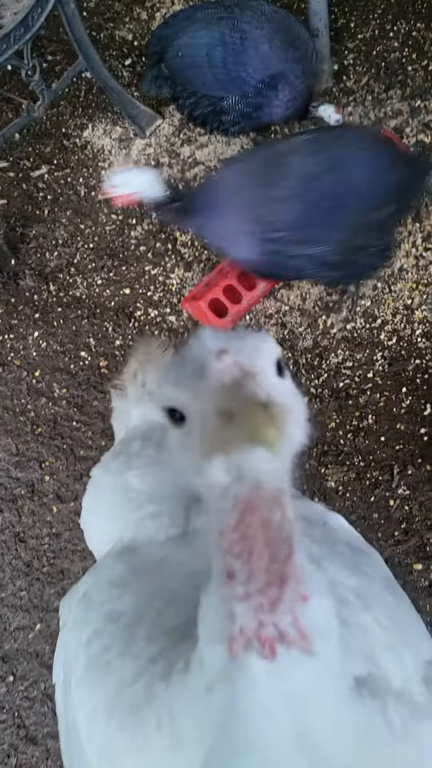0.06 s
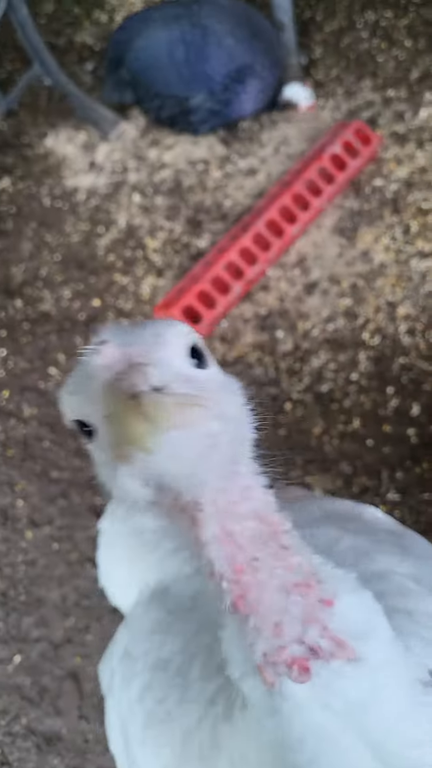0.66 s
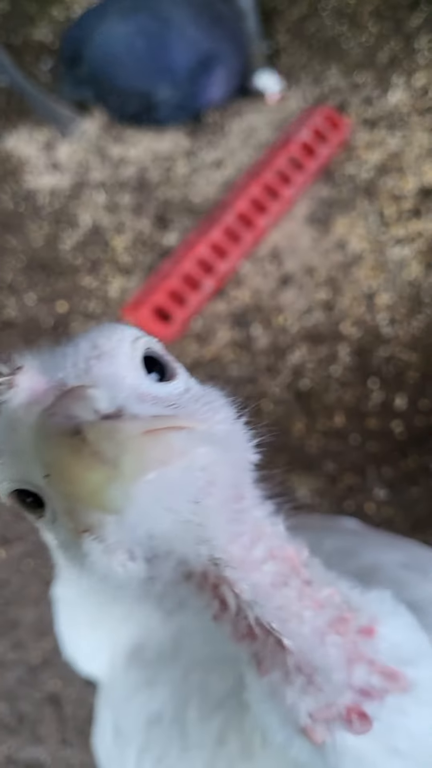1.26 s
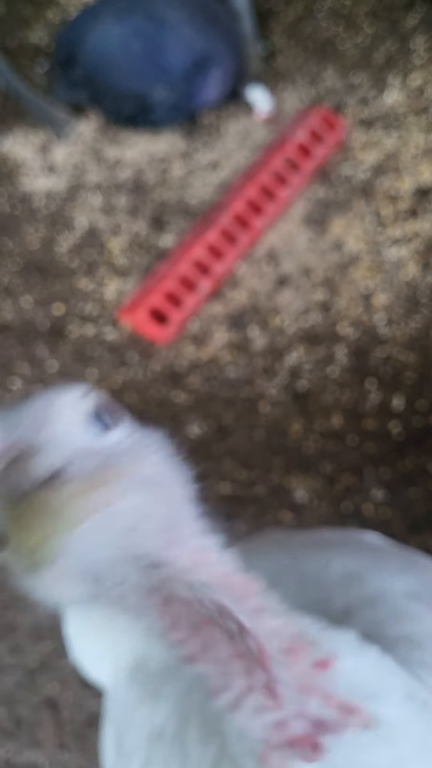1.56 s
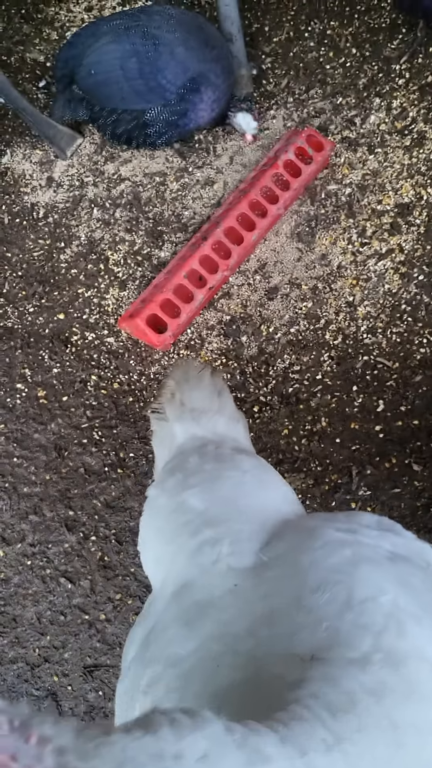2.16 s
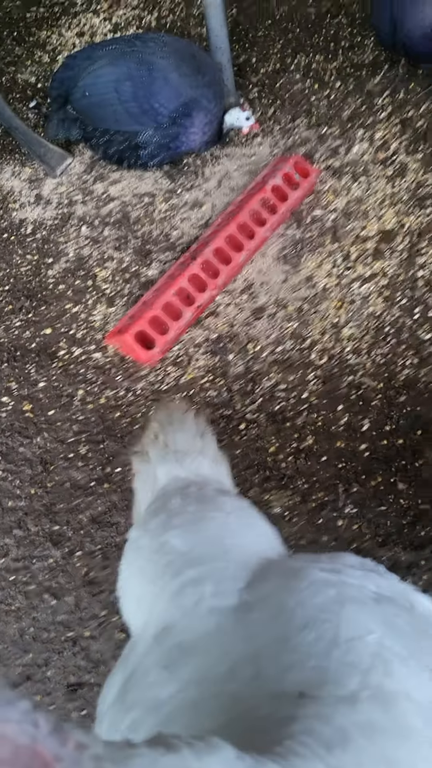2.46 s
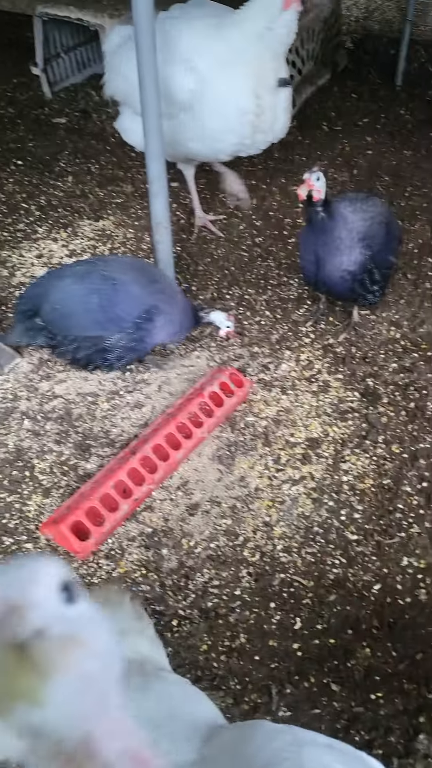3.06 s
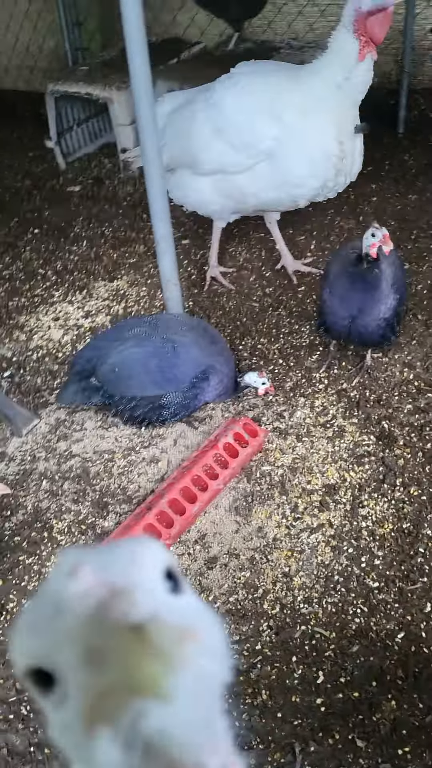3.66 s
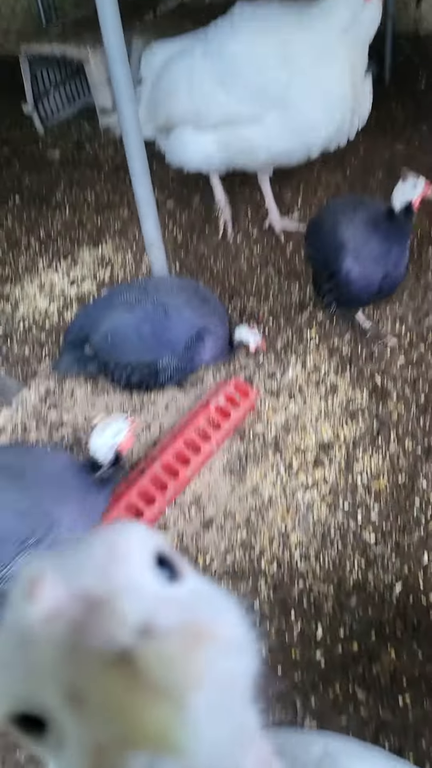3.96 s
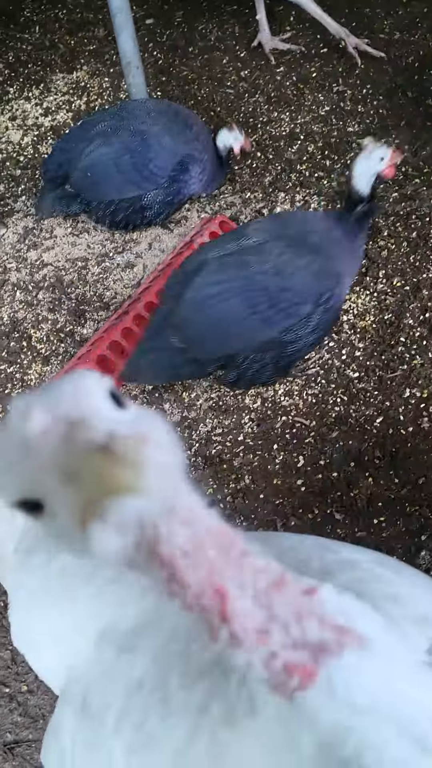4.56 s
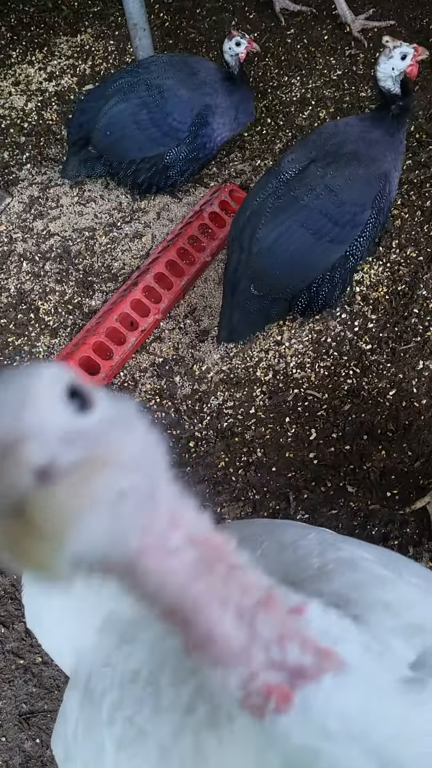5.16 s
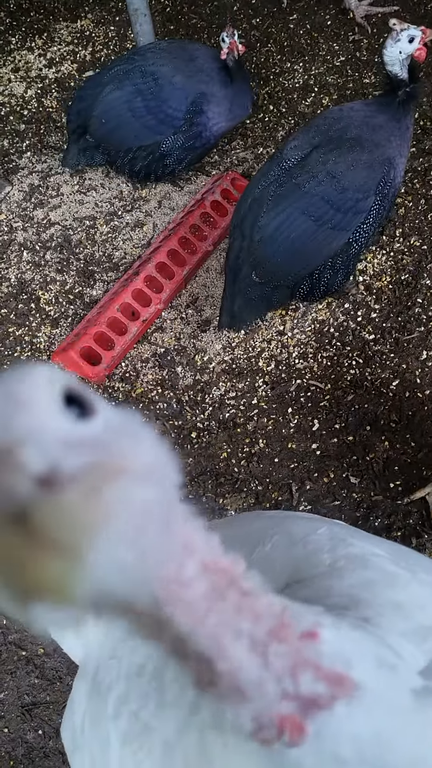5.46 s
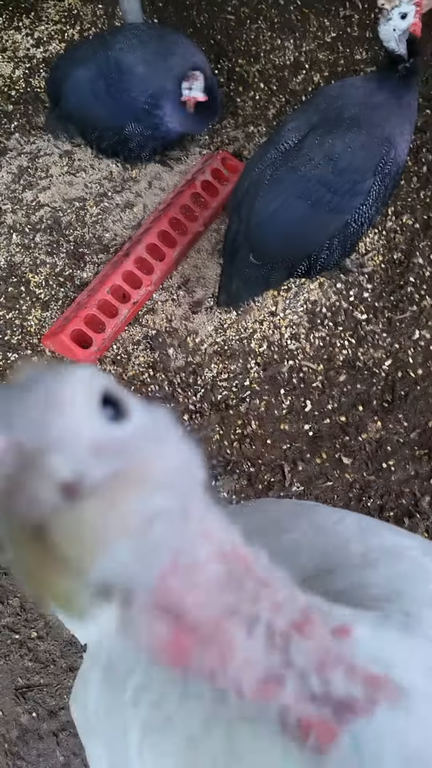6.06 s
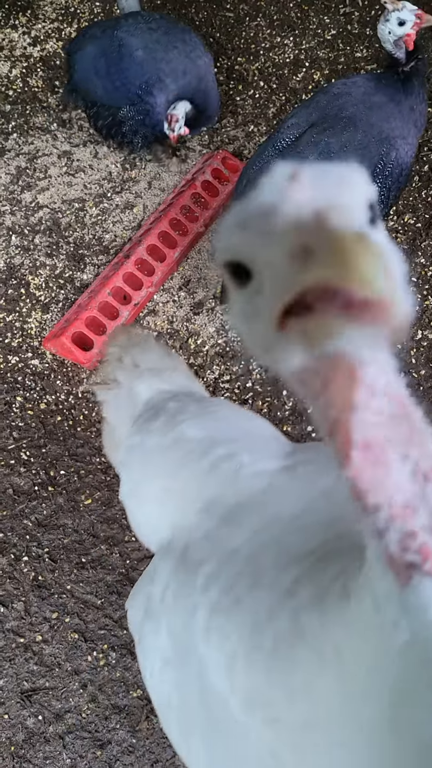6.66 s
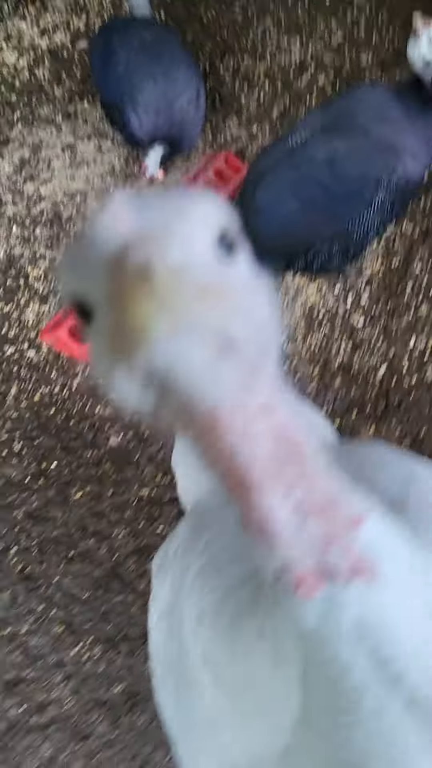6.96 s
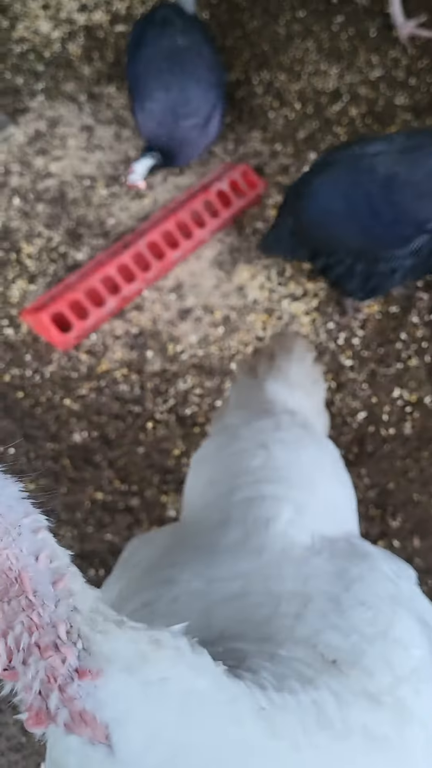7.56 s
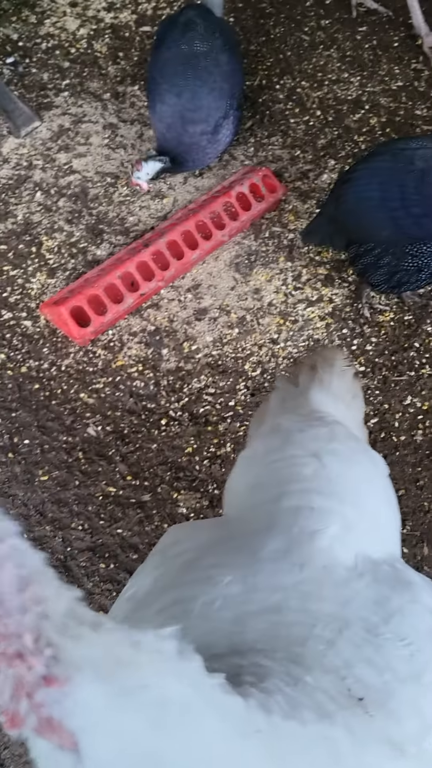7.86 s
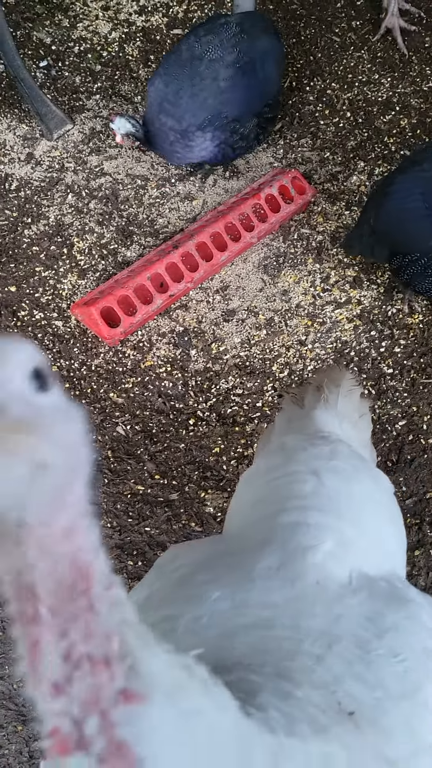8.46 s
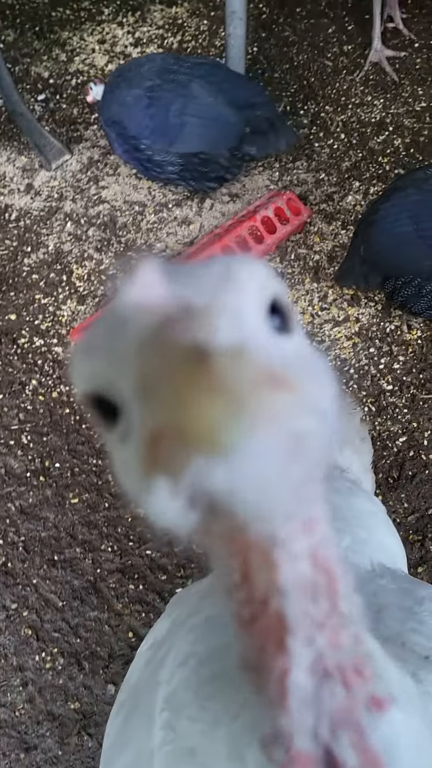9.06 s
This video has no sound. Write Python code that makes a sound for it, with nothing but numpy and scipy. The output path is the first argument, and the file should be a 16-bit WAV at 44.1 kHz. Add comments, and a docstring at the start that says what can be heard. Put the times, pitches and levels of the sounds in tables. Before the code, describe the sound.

Over the low rumble of far traffic, a guineafowl makes scattered brief chips and peeps among light seed clicks and faint rustling. Midway it pecks sharply right by the microphone, honks once through its nose-like call and clucks softly, then pecks harder. Near the end a rooster crows far off and two more taps crack. The covered pen adds a brief reverberation.

```python
"""A short two-voiced chip sounds over a low rumble: a guineafowl feeds on a wooden bench in a roofed pen.
Its syrinx gives chips, thin peeps and one nasal honk, which ends like a knock before a soft low cluck.
Between them come a few hard, very close taps, each a crack and a damped ring; seeds tick and feet scuff.
Far traffic rumbles and hums, something rustles faintly, and near the end a distant rooster crows.
Reflections from the roof and walls add a brief reverberation."""
import sys
import numpy as np
from scipy import signal
from scipy.fft import rfft, irfft, next_fast_len
from scipy.io import wavfile
from scipy.ndimage import map_coordinates

SR = 44100
rng = np.random.default_rng(int(sys.argv[2]) if len(sys.argv) > 2 else 0)


def generate_wav(signal):
    """Clip the signal to [-1, 1] and save it as 16-bit WAV at the path in sys.argv[1]."""
    frames = np.transpose(np.atleast_2d(signal))
    scaled = np.clip(frames, -1, 1) * 32767
    pcm = np.round(scaled).astype(np.int16)
    wavfile.write(sys.argv[1], SR, pcm)


N = 411012
TOP_HZ, BIRD_LAG_MS = 16000, 0.2677  # band limit; delay of chips and honk in the right channel
SIDES = np.array([[.5], [-.5]])  # splits a difference between left and right

# Spectra of the background noises. Each row: frequency in Hz, relative density in dB.
RUMBLE_SPECTRUM = [(15, -48), (30, -19), (46, -2.5), (70, 1.5), (100, -0.5), (135, -4), (190, -9),
                   (260, -15), (350, -16), (450, -32.5), (900, -90)]
DRONE_SPECTRUM = [(150, -24), (300, -5), (500, -2.5), (800, 2.5), (1100, -4.5), (1500, -7.5), (2000, -16.5),
                  (3000, -26.5), (5000, -29.5), (9500, -39.5)]
HISS_SPECTRUM = [(500, -10), (3000, -0.5), (5000, -0.5), (6500, -1), (8000, 4), (9200, -7), (15000, -7.5)]
RUSTLE_SPECTRUM = [(800, -15), (2500, 0.5), (4500, 1), (6000, -1.5), (7900, 2), (9300, -4.5), (13000, -4.5),
                   (16000, -17)]
# Course of the traffic. Each row: time in seconds, relative drone and rumble levels in dB.
TRAFFIC_LEVELS = [(0.0, -50.5, -40), (1.63, -53, -39.5), (4.13, -49.5, -39.5), (4.49, -49.5, -39),
                  (4.7, -52.5, -41.5), (6.85, -54, -43), (7.58, -49.5, -38), (8.98, -47.5, -37.5),
                  (9.32, -47.5, -39.5)]
# Course of the hum. Each row: time in seconds, level in dB.
HUM_LEVELS = [(0, -45.5), (4.8, -45.5), (7, -42), (8.2, -39), (9.32, -40)]
# Swells of the rustle. Each row: middle in seconds, half width in seconds, level in dB.
RUSTLE_SWELLS = [(0.7, 0.38, -67), (2.78, 0.32, -63.5), (3.93, 0.32, -59), (4.45, 0.13, -67),
                 (5.9, 0.25, -67.5), (7.08, 0.13, -60), (7.72, 0.16, -60.5)]
# Likeness of the channels in the background. Each row: frequency in Hz, coherence from 0 to 1.
COHERENCE = [(60, 0.99), (350, 0.95), (700, 0.73), (1000, 0.59), (2000, 0.11), (3000, 0.033)]
# Phase of the background. Each row: frequency in Hz, lead of the left channel in radians.
LEFT_LEAD = [(100, .05), (440, 0.39), (520, 0.75), (750, 1.89), (900, 2.29), (1300, 2.9), (2000, 4.4)]
# Reverberation of the pen. Each row: frequency in Hz, time to fall 60 dB in seconds.
PEN_T60 = [(100, 0.15), (600, 0.086), (1500, 0.099), (3500, 0.17), (8000, 0.15), (15000, 0.097)]
# Notes of the crow. Each row: start and length in seconds, first and last pitch in Hz, level in dB.
CROW_NOTES = [(8.15, 0.27, 489, 535, -55), (8.4, 0.68, 823, 900, -59.5), (8.95, 0.37, 844, 822, -58)]
# Feet in the litter. Each row: start and length in seconds, level in dB, band centre in Hz.
FOOT_SCUFFS = [(0.235, 0.039, -40, 3720), (3.985, 0.032, -43.5, 1680), (7.109, .045, -44.5, 980)]
# The clearest seed clicks. Each row: start in seconds, relative level in dB.
SEED_CLICKS = [(0.5583, -42), (0.802, -44), (0.885, -45), (1.463, -40.5), (2.0492, -48), (2.4963, -48),
               (2.637, -49.5), (4.409, -47.5), (4.9815, -44), (6.138, -49), (6.2602, -51), (6.654, -49.5),
               (8.4682, -47.5), (9.1593, -39)]
# Close taps, plus the honk's knock-like ending (4.627 s) and a soft low cluck (4.729 s).
# Each row: start in seconds, level in dB, ring in Hz, relative hardness in dB, left minus right in dB.
TAPS_AND_CLUCK = [(0.2375, -29, 1030, 4, 4), (3.248, -35, 1090, -12, -3), (3.988, -26, 1440, -8, -5),
                  (4.2975, -5.5, 477, -1.5, -1.5), (4.3112, -24, 1152, 2.5, 6), (4.319, -16, 560, -4.5, -1),
                  (4.328, -21, 1460, -2, -5), (4.627, -12, 1540, -16, -3.5), (4.729, -28, 480, -27, 4),
                  (5.8997, -3.5, 1142, -1.5, -2), (5.9115, -27, 1510, 8, 0), (5.9165, -9.5, 900, 2.5, 2.5),
                  (5.9283, -2, 263, -8, -2), (5.9365, -25, 1100, 5, 0), (6.321, -31, 1380, -23, -3),
                  (9.2437, -7.5, 1150, 1.5, -1), (9.2649, -13, 1030, -6, 2)]
# Spectra of a seed's click and of a crack. Each row: frequency in Hz, relative level in dB.
SEED_SPECTRUM = [(1000, -8), (3500, -12), (6500, 1), (8200, 0.5), (9500, -11), (13000, -9), (16000, -25)]
CRACK_SPECTRUM = [(200, -1), (1200, 9.5), (2500, -2), (3200, -2), (5500, -3), (8000, -6), (9500, -15.5),
                  (13000, -14), (16000, -25)]
# Resonances that colour the far crow, the honk and the chips. Each row: frequency in Hz, gain in dB.
CROW_FORMANTS = [(450, 7), (900, 5), (1100, 0), (1800, -19), (3000, -39), (5000, -65)]
NASAL_FORMANTS = [(600, 1.5), (960, -3.5), (1950, -1), (2900, -15.5), (3900, -15), (4900, -22),
                  (5800, -22.5), (6700, -45), (7900, -25.5), (10000, -35), (12000, -48), (14500, -36.5),
                  (16000, -55)]
THROAT_FORMANTS = [(300, -27), (850, -12), (1400, 1), (1900, 8), (2600, -4.5), (4000, -8.5), (4900, -9.5),
                   (5600, -9), (7500, -26), (9000, -29.5), (12500, -26.5), (15500, -36)]
# Colour of a chip's sidebands. Each row: frequency in Hz, gain in dB.
SIDEBAND_GAINS = [(450, -31), (900, -10.5), (1800, -5.5), (2300, 2.5)]
# Thin whistles. Each row: start and length in seconds, top pitch in Hz, highest level in dB,
# fraction of the pitch arch that is sung, overtone level in dB.
PEEP_NOTES = [(0.399, 0.032, 3050, -26.5, 0.88, -8), (2.164, 0.038, 2020, -46, 0.7, -22),
              (3.132, 0.033, 2480, -33, 1.0, -20), (3.834, 0.039, 2424, -39.5, 0.74, -13),
              (5.242, 0.021, 1520, -45, 0.7, -22), (7.078, 0.034, 2450, -47, 0.68, -13),
              (7.769, 0.038, 2700, -38.5, 0.95, -11), (8.545, 0.037, 2120, -41, 0.74, -20),
              (9.041, 0.0305, 3150, -30.5, 0.88, -11), (9.097, 0.053, 2300, -42, 0.8, -24)]
# Two-voiced chips. Each row: start and length in seconds, first and last pitch in Hz, level in dB,
# depth of the second voice, tilt in dB per octave, left minus right of the main tone in dB.
CHIP_NOTES = [(0.03, 0.034, 1355, 1275, -29.5, 0.45, -6, 1), (0.424, 0.019, 1461, 1280, -20, 0.11, 1, 8),
              (0.941, 0.025, 1411, 1340, -25, 0.48, -7, -7),
              (1.879, 0.035, 1395, 1518, -20.5, 0.83, -3.5, 6.5),
              (2.768, 0.029, 1406, 1318, -26, 0.84, -4, 7.5),
              (4.622, 0.015, 1510, 1246, -22.5, 0.66, -3.5, 0),
              (7.554, 0.035, 1312, 1432, -25, 0.77, -3, -7.5),
              (8.752, 0.018, 1350, 1267, -28, 0.47, -7.5, -6),
              (9.066, 0.017, 1404, 1292, -19.5, 0.45, -0.5, -8)]


def amp(db):
    """Amplitude grows tenfold for every 20 dB."""
    return 10 ** (np.asarray(db) / 20)


def unit(x):
    """Normalisation brings the rms to 1."""
    return x / np.sqrt(np.mean(x ** 2) + 1e-20)


def along(points, hz):
    """Interpolation reads (Hz, value) points on a logarithmic frequency axis."""
    knots_hz, values = np.transpose(points)
    return np.interp(np.log(hz + 1), np.log(knots_hz + 1), values)


def curves(rows, t):
    """Linear interpolation reads each column after the first at the times t."""
    times, *columns = np.transpose(rows)
    return [np.interp(t, times, column) for column in columns]


def wobble(rate, size):
    """A spline through random knots, rate of them a second, fluctuates smoothly."""
    knots = rng.standard_normal(int(size * rate / SR) + 4)
    return map_coordinates(knots, [np.arange(size) * rate / SR])


def filtered(x, response):
    """A linear filter multiplies the spectrum by its frequency response."""
    size = x.shape[-1]
    padded = next_fast_len(size + 2048)
    return irfft(rfft(x, padded) * response(np.fft.rfftfreq(padded, 1 / SR)), padded)[..., :size]


def noise(spectrum, size):
    """Filtering colours white noise; the rms is 1."""
    return unit(filtered(rng.standard_normal(size), lambda hz: amp(along(spectrum, hz))))


def placed(x, lag_ms, pan_db):
    """Differences of time and level between the channels give a sound its direction."""
    return amp(SIDES * pan_db) * filtered(x, lambda hz: np.exp(2j * np.pi * hz * SIDES * lag_ms / 1000))


def add(out, start_s, x):
    """Superposition: a stereo sound adds to what is already there."""
    start = max(round(start_s * SR), 0)
    out[:, start:start + x.shape[1]] += x[:, :N - start]


def swell(u, edge):
    """A raised-cosine taper rounds both ends of a note over u = 0..1."""
    return np.sin(np.pi / 2 * np.clip(np.minimum(u, 1 - u) / edge, 0, 1)) ** 2


def phase_of(hz):
    """Phase is the integral of frequency."""
    return 2 * np.pi * np.cumsum(hz) / SR


def diffuse_field(response):
    """Noise from many directions loses coherence between the channels as frequency rises; rms 1."""
    def mid_side_gains(hz):
        angle = np.arccos(np.clip(along(COHERENCE, hz), 0, 1)) / 2
        return response(hz) * np.array([np.cos(angle), np.sin(angle)])
    mid, side = filtered(rng.standard_normal((2, N)), mid_side_gains)
    pair = np.array([mid + side, mid - side])
    return unit(filtered(pair, lambda hz: np.exp(1j * along(LEFT_LEAD, hz) * SIDES)))


def background(hum_hz=89.4, hiss_db=-73, trill_hz=7300, trill_db=-68):
    """Diffuse noise bands add: far traffic's rumble, drone and hum, a rustle, an early trill, hiss."""
    t = np.arange(N) / SR
    wide = lambda spectrum: diffuse_field(lambda hz: amp(along(spectrum, hz)))
    narrow = lambda centre, width_hz: diffuse_field(lambda hz: 1 / (1 + ((hz - centre) / width_hz) ** 2))
    drone_db, rumble_db = curves(TRAFFIC_LEVELS, t)
    rumble = amp(rumble_db + 0.7) * wide(RUMBLE_SPECTRUM)
    drone = amp(drone_db + 2.3 + 1.3 * wobble(7.8, N)) * wide(DRONE_SPECTRUM)
    hum = amp(curves(HUM_LEVELS, t)[0]) * narrow(hum_hz, width_hz=4)
    swells = sum(amp(db) * np.exp(-((t - middle) / width) ** 2 / 2)
                 for middle, width, db in RUSTLE_SWELLS)
    rustle = swells * amp(1.1 * wobble(14, N)) * wide(RUSTLE_SPECTRUM)
    trill_envelope = amp(trill_db + 2.1 * wobble(24, N)) * swell((t - .45) / 0.69, 0.11)
    trill = trill_envelope * narrow(trill_hz, width_hz=480)
    return rumble + drone + hum + rustle + trill + amp(hiss_db) * wide(HISS_SPECTRUM)


def pen_reverberation(x, delay_s=.009):
    """Reflections from roof and walls decay exponentially, each frequency at its own rate."""
    hz, t, spectra = signal.stft(rng.standard_normal((2, SR // 2)), SR, nperseg=256)
    decay = amp(-60 * t / along(PEN_T60, hz)[:, None])
    tail = signal.istft(spectra * decay, SR, nperseg=256)[1]
    tail = np.pad(tail / np.linalg.norm(tail[0]), ((0, 0), (int(delay_s * SR), 0)))
    return signal.fftconvolve(x, tail, axes=1)[:, :N]


def syrinx(pitch, formants, tilt_db=0, flicker_db=0, count=16):
    """Source and filter: harmonics are weighted by the throat and tilted by effort; each may flicker."""
    k = np.arange(1, count + 1)[:, None]
    flicker = flicker_db * np.log2(2 * k) * np.array([wobble(300, len(pitch)) for _ in k])
    gains = amp(along(formants, k * pitch) + tilt_db * np.log2(k) + flicker) * (k * pitch < TOP_HZ)
    return np.sum(gains * np.sin(k * phase_of(pitch)), 0) / np.sqrt(np.sum(gains ** 2, 0) / 2)


def rooster_crow(rasp=0.28, waver=0.013):
    """Random modulation roughens a distant, dull crow: a low note, then higher held ones."""
    out = np.zeros((2, N))
    for start, length, start_hz, end_hz, db in CROW_NOTES:
        u = np.linspace(0, 1, int(length * SR))
        pitch = (start_hz + (end_hz - start_hz) * u) * (1 + waver * wobble(60.5, len(u)))
        call = syrinx(pitch, CROW_FORMANTS, count=4) * (1 + rasp * wobble(70.4, len(u)))
        add(out, start, placed(amp(db) * swell(u, 0.13) * call, lag_ms=0.32, pan_db=0))
    return out


def scuffs(grit_db=4, width_octaves=0.63):
    """Friction of feet on litter makes a band of gritty noise that starts fast and trails off."""
    out = np.zeros((2, N))
    for start, length, db, centre_hz in FOOT_SCUFFS:
        u = np.linspace(0, 1, int(length * SR))
        grit = rng.standard_normal((2, len(u))) * amp(grit_db * wobble(970, len(u)))
        band = lambda hz: 1 / (1 + (np.log2((hz + 1) / centre_hz) / width_octaves) ** 4) ** .5
        add(out, start, amp(db) * unit(filtered(grit, band)) * swell(np.sqrt(u), 0.35))
    return out


def seeds(t60=0.048, gain_db=-5, faint_per_s=3.6):
    """Small impacts of seeds and grit radiate decaying noise: a few clearly, many faintly at random."""
    out = np.zeros((2, N))
    t = np.arange(SR // 20) / SR
    draws = rng.random((int(faint_per_s * N / SR), 2))
    faint = [(when * N / SR, -57 + 2 * size) for when, size in draws]
    for start, db in SEED_CLICKS + faint:
        click = np.array([noise(SEED_SPECTRUM, len(t)) for _ in range(2)])
        add(out, start, amp(db + gain_db - 60 * t / t60) * click)
    return out


def taps_and_cluck(ring_t60=0.011, crack_t60=0.014, rattle_t60=0.11, rattle_db=-21, thump_hz=81.2):
    """Damped modes and decaying noise give close taps, the honk's knock-like ending and a low cluck."""
    out = np.zeros((2, N))
    t = np.arange(SR // 6) / SR
    fade = lambda t60: amp(-60 * t / t60)
    mode = lambda hz, t60: np.sin(2 * np.pi * hz * t) * fade(t60)
    thump = lambda hz: mode(hz, t60=0.06) - 1.2 * mode(hz * 2.1, t60=0.031)
    jolt = thump(thump_hz) + 2 * SIDES * thump(thump_hz * 0.72)  # unequal in the two channels
    crack_envelope = fade(crack_t60) + amp(rattle_db) * fade(rattle_t60)
    for start, db, ring_hz, hard_db, pan_db in TAPS_AND_CLUCK:
        modes = mode(ring_hz, ring_t60) + 0.2 * mode(ring_hz * 1.5, ring_t60)
        ring = placed(modes, lag_ms=0.19, pan_db=-4.5)
        crack = np.array([noise(CRACK_SPECTRUM, len(t)) for _ in range(2)]) * crack_envelope
        thump_db = 1.6 * db - 4.5  # grows faster than the ring's level
        burst = amp(db) * (ring + amp(hard_db - 3.5) * crack) + amp(thump_db) * jolt
        add(out, start, placed(burst, 0, pan_db))
    return out


def peeps(jitter=0.03, rough=0.3, arch_top=0.6, crescendo_db=27, accent_db=10):
    """Frequency modulation bends hoarse whistles along an arch; some stop near its top, others fall."""
    out = np.zeros((2, N))
    for start, length, top_hz, db, reach, overtone_db in PEEP_NOTES:
        u = np.linspace(0, 1, int(length * SR))
        past_top = reach * u - arch_top
        bend = np.where(past_top < 0, 0.75, 1.9)  # a gentle climb, a steep fall
        pitch = top_hz * (1 - bend * past_top ** 2) * (1 + jitter * wobble(650, len(u)))
        phase = phase_of(pitch)
        tone = np.sin(phase) + amp(overtone_db) * np.sin(2 * phase)
        tone *= 1 + rough * (1 + u) * wobble(1756, len(u))  # frays towards its end
        envelope = swell(u, 0.16) * amp(crescendo_db * past_top + accent_db * np.maximum(past_top, 0))
        note = amp(db) * unit(tone) * envelope / envelope.max()
        add(out, start, placed(note, lag_ms=0.33, pan_db=-1.5))
    return out


def honk(start_s=4.523, jump_s=4.551, drop_s=4.627, end_s=4.648, db=-16):
    """Register breaks shape a nasal note: it starts low, jumps up, sags and drops to a soft croak."""
    low_hz, high_hz, croak_hz, sag_hz_per_s = 914, 1001.4, 607, 650
    attack_s, shift_s = 0.028, 0.0055
    jitter, rasp_db, flutter_db, croak_db = 0.0099, -21, 2.8, -11
    out = np.zeros((2, N))
    t = np.arange(start_s, end_s, 1 / SR)
    jump, drop = (np.clip((t - when) / shift_s + .5, 0, 1) for when in (jump_s, drop_s))
    held_hz = high_hz - sag_hz_per_s * (t - jump_s)
    pitch = low_hz * (1 - jump) + held_hz * (jump - drop) + croak_hz * drop
    pitch *= 1 + jitter * wobble(1108, len(t))
    tilt_db = wobble(183, len(t)) - 5 * drop  # the treble shimmers; the croak is duller
    tone = syrinx(pitch, NASAL_FORMANTS, tilt_db, flicker_db=1.2)
    rasp = amp(rasp_db) * noise(THROAT_FORMANTS, len(t)) * (1 + np.cos(phase_of(pitch)))
    envelope = np.clip(np.minimum((t - start_s) / attack_s, (end_s - t) / shift_s), 0, 1)
    level = amp(db + croak_db * drop + flutter_db * wobble(148, len(t)))
    add(out, start_s, placed(level * envelope * (tone + rasp), BIRD_LAG_MS, pan_db=-1.2))
    return out


def chips(slow_ratio=0.335, jitter=0.018, drift=0.026, rasp_db=-19, scoop_db=-23, scoop_s=0.029):
    """Biphonation: a slower second oscillator breaks in and modulates a hard note into sidebands."""
    out = np.zeros((2, N))
    for start, length, start_hz, end_hz, db, depth, tilt_db, pan_db in CHIP_NOTES:
        u = np.arange(int((length + 0.0053) * SR)) / SR / length
        pitch = (start_hz + (end_hz - start_hz) * u) * (1 + jitter * wobble(630, len(u)))
        slow_phase = phase_of(pitch * slow_ratio * (1 + drift * wobble(630, len(u))))  # loosely locked
        tone = syrinx(pitch, THROAT_FORMANTS, tilt_db, flicker_db=1)
        modulator = 1.32 * np.cos(slow_phase) + 1.47 * np.cos(2 * slow_phase + 1)
        break_in = np.clip(u / 0.49, 0, 1) ** 2
        sidebands = filtered(tone * modulator * break_in, lambda hz: amp(along(SIDEBAND_GAINS, hz)))
        rasp = amp(rasp_db + tilt_db) * noise(THROAT_FORMANTS, len(u)) * (1 + np.cos(slow_phase))
        note = amp(db) * swell(u, 0.29) * unit(tone + depth * sidebands + rasp)
        balance = lambda hz: amp(SIDES * along([(1600, pan_db), (2600, 3)], hz))  # treble leans left
        add(out, start, filtered(placed(note, BIRD_LAG_MS, 0), balance))
        # a faint rising scoop leads into the note
        rise = np.linspace(0, 1, int(scoop_s * SR))
        scoop = np.sin(phase_of(start_hz * (1.4 + 0.435 * rise))) * swell(rise, 0.36)
        add(out, start - 0.43 * scoop_s, placed(amp(db + scoop_db) * scoop, BIRD_LAG_MS, 0))
    return out


def scene():
    """Direct sound, the pen's reverberation and the background add by superposition."""
    voice = chips() + peeps() + honk()
    transients = taps_and_cluck() + seeds() + scuffs()
    rooster = rooster_crow()
    reflections = pen_reverberation(amp(-12) * voice + amp(-22.5) * transients + amp(-3.5) * rooster)
    return voice + transients + rooster + reflections + background()


def record(dry):
    """The microphone rolls off the bass, saturation rounds the loudest taps, and the band is limited."""
    low_cut_hz, ceiling = 31, .95
    thinned = signal.sosfilt(signal.butter(2, low_cut_hz, "highpass", fs=SR, output="sos"), dry)
    rounded = thinned / (1 + (thinned / ceiling) ** 4) ** .25
    return filtered(rounded, lambda hz: hz < TOP_HZ)


dry = scene()
out = record(dry)
generate_wav(out)
```